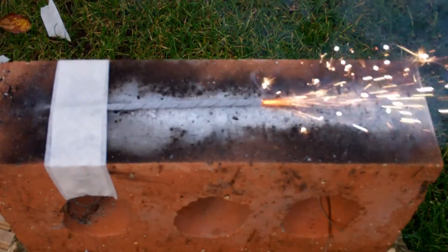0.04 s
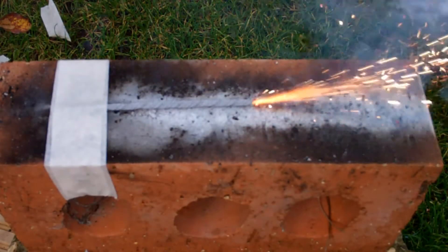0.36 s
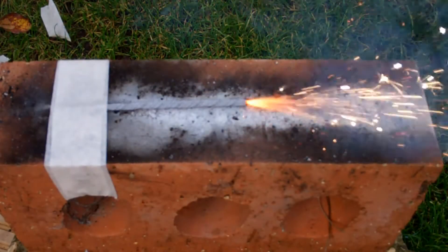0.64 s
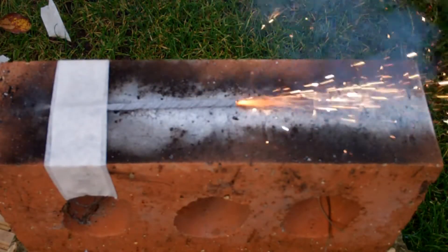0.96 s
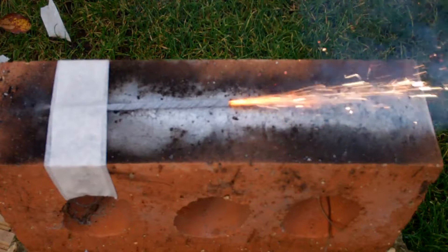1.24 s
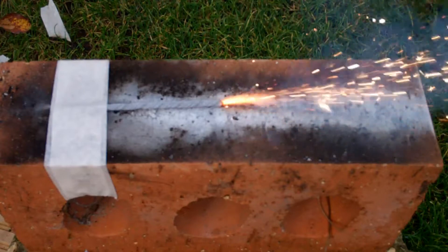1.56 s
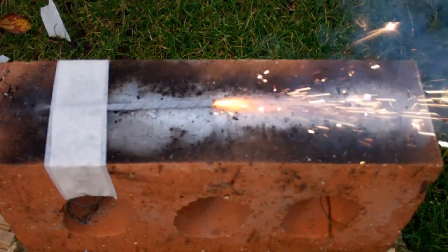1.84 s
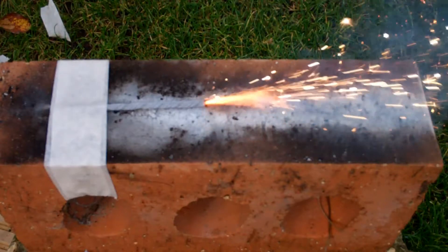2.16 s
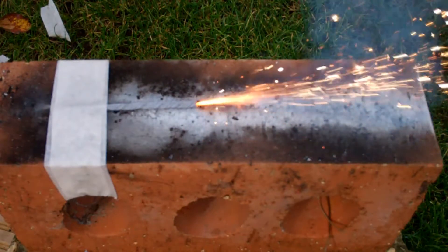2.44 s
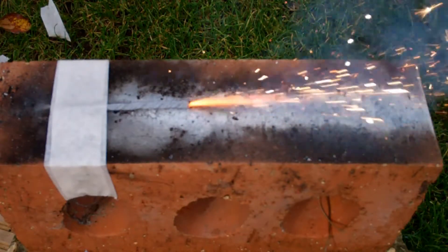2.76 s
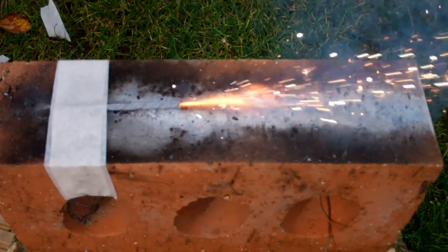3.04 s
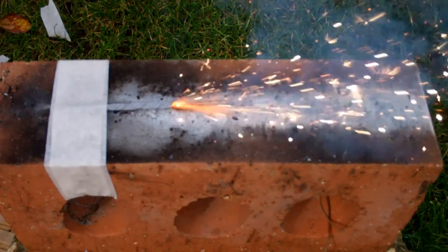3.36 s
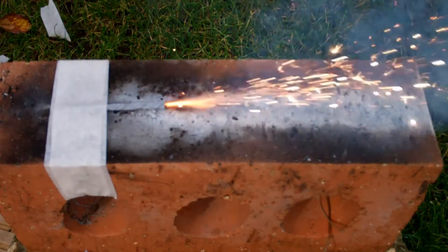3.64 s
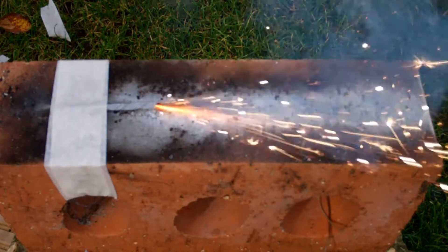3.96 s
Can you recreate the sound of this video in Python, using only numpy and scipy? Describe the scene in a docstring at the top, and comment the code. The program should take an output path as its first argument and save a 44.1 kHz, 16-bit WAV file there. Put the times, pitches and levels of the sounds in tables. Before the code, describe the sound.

Close up in the open air, a burning fuse hisses and sputters throughout. A quick cluster of loud cracks comes first, followed by scattered pops, a stretch of plain fizzing and two last snaps, each with a very short tail.

```python
"""Outdoors by a lawn, a fuse burns along a brick, close to the microphone.
Its jet of gas hisses brightly and fizzes with tiny sparks. Now and then a grain of powder bursts
with a crack and a puff, and the loud ones overload the microphone. A nearby surface throws each
crack back, and the lawn and surroundings scatter it into a short tail."""
import sys
import numpy as np
from scipy import signal
from scipy.fft import rfft, irfft
from scipy.io import wavfile

SR = 44100
rng = np.random.default_rng(int(sys.argv[2]) if len(sys.argv) > 2 else 0)


def dump_mix(stems):
    """Bounce the given channels to the path in sys.argv[1] as a 16-bit WAV at rate SR."""
    frames = np.atleast_2d(stems).T  # one column per channel
    limited = np.clip(frames, -1, 1)  # hard clip at full scale
    pcm = np.round(limited * 32767).astype(np.int16)
    wavfile.write(sys.argv[1], SR, pcm)


N = 176400  # 4 seconds

HISS_BOOST_DB, FLUTTER_DB, FLUTTER_HZ, SWAY_DB, SWAY_HZ = 3.5, 0.69, 45, 0.66, 6.6
SPARKS_PER_S, SPARK_DB, SPARK_SPREAD_DB, SPARK_LOW_HZ = 1500, -9, 2.5, 1500
# How strongly the fuse burns: (time [s], relative level [dB])
BURN_STRENGTH = [(0, -28.5), (.06, -28), (.11, -27), (.21, -25.5), (.32, -27.5), (.445, -29), (.47, -21.5),
                 (.59, -26), (.72, -24.5), (.81, -23), (.97, -26.5), (1.07, -25.5), (1.15, -26),
                 (1.33, -26), (1.42, -24.5), (1.64, -24.5), (1.98, -24), (2.17, -25), (2.52, -24),
                 (2.68, -24.5), (2.92, -24.5), (3.08, -24.5), (3.17, -27), (3.23, -24), (3.34, -27.5),
                 (3.4, -22.5), (3.47, -25), (3.62, -25), (3.87, -25), (3.93, -25), (4, -24)]
# The tone of the hiss, from low to high: (frequency [Hz], relative level [dB])
HISS_TONE = [(40, -28), (130, -23.5), (260, -15.5), (350, -11), (540, -6), (730, -11), (880, -8.5),
             (1080, -10.5), (1350, -2.5), (1720, -1.5), (2150, -6), (2400, -3), (2570, -3.5), (2850, -0.5),
             (3450, -6), (3950, -2.5), (4450, -5.5), (5500, -3), (7000, -5.5), (8100, -1.5), (9600, -3),
             (11000, -0.5), (12400, -0.1), (13500, 3), (14200, 2)]
# How wide the hiss sounds: (frequency [Hz], sides minus middle [dB])
HISS_WIDTH = [(100, -15), (450, -18.5), (1700, -19.5), (2100, -31), (2700, -42), (3500, -36), (3950, -27),
              (4500, -31), (5100, -12), (6800, -4.5), (8200, -6.5), (14000, -5.5)]
# Which way the hiss leans: (frequency [Hz], left minus right [dB])
HISS_BALANCE = [(100, 3), (500, 2.5), (1000, 3), (2100, 0), (3500, 8), (4800, -2.8), (6200, 3.5),
                (9000, -1), (11500, -1), (14000, -2)]
def burning_fuse():
    """The gas jet and its sparks share one tone and swell and flutter as the fuse burns."""
    jet = rng.standard_normal((2, N)) + from_db(SPARK_DB) * sparks()
    wide_spectrum = stereo(rfft(jet), per_frequency(HISS_WIDTH))
    hiss = irfft(wide_spectrum * panned(per_frequency(HISS_BALANCE)), N)
    burn_db = np.interp(np.arange(N) / SR, *np.transpose(BURN_STRENGTH))
    waver_db = FLUTTER_DB * drift(FLUTTER_HZ) + SWAY_DB * drift(SWAY_HZ)
    return with_tone(hiss, HISS_TONE) * from_db(HISS_BOOST_DB + burn_db + waver_db)


def sparks():
    """Sparks make a dense spray of tiny ticks of uneven size."""
    born = rng.random((2, N)) < SPARKS_PER_S / SR
    size = from_db(SPARK_SPREAD_DB * np.minimum(rng.exponential(1, (2, N)), 5))
    sign = rng.choice([-1, 1], (2, N))
    return unit_level(keep_band(born * size * sign, SPARK_LOW_HZ, "high"))


# The tone of the gas noise inside every crack: (frequency [Hz], relative level [dB])
CRACK_TONE = [(200, 2.5), (600, -3.5), (1100, -2.5), (1900, -2), (3700, -0.5), (6500, -0.5), (9000, 3.5),
              (14000, 8.5)]
# One bursting grain a row: (time [s], crack level [dB], hold [ms], brightness [Hz], colour peak [Hz],
# shock level [dB], puff level [dB], scatter level [dB], crack's lean to the left [dB])
POWDER_GRAINS = [(0.1496, -10.5, 0.64, 4500, 1190, -15.5, -36, -43, 0),
                 (0.1844, -2.5, 3.1, 2590, 500, 2.5, 7, -28, -0.5),
                 (0.234, -1, 1.3, 2520, 3600, -13, -21, -29, 9),
                 (0.2411, -1, 3, 1490, 2860, -12, 2, -15.5, 3),
                 (0.2628, -1.5, 3.9, 5240, 4170, -8, 3.5, -23, 1),
                 (.4552, -6, 3.3, 10700, 4530, -16, -8, -24, 0.5),
                 (0.5538, -4.5, 1.1, 3940, 2700, -17, -24, -35, 1.5),
                 (0.6265, -4, 1.54, 4000, 960, -7, -2, -26, -0.5),
                 (0.9023, 0.5, 1.9, 8150, 1110, -1.5, -4.5, -22.5, 8),
                 (1.098, -17.5, 4.3, 12000, 5000, -36, -34, -50, 2),
                 (1.3589, -8.5, 4.7, 8950, 1100, -11.5, -11.5, -21.5, 3),
                 (3.6690, -8, 4.4, 9400, 585, -9, -7.5, -21, 4.5),
                 (3.7536, -1.5, 2.36, 4220, 3630, -13, -10, -18, 4)]
def bursting_grains():
    """Each grain of powder gives a crack, a shock and a puff, and the garden answers."""
    cracks, puffs, scatter_power = np.zeros((2, N)), np.zeros((2, N)), np.zeros(N)
    gas = with_tone(stereo(rng.standard_normal((2, N)), side_db=-2.34), CRACK_TONE)
    for start, crack_db, hold_ms, top_hz, colour_hz, shock_db, puff_db, scatter_db, pan in POWDER_GRAINS:
        age = np.maximum(np.arange(N) / SR - start, 0)  # seconds since the burst
        snap = from_db(crack_db) * crack(age, gas, hold_ms, top_hz, colour_hz)
        cracks += panned(pan) * (snap + from_db(shock_db) * shock(age))
        puffs += from_db(puff_db) * panned(2 + 1.6 * pan) * puff(age)  # leans further than the crack
        scatter_power += from_db(scatter_db) ** 2 * echo_power(age)
    direct = keep_band(cracks, hz=220, kind="high") + keep_band(puffs, hz=60, kind="high")
    return direct + garden_scatter(scatter_power)


def crack(age, gas, hold_ms, top_hz, colour_hz, rise_s=0.000091, fade_s=0.0019, colour_db=2):
    """A burst of noise with one broad band made louder jumps up, holds for a moment and dies."""
    past_hold = np.maximum(age - hold_ms / 1000, 0)
    loudness = np.minimum(age / rise_s, 1) * np.exp(-np.minimum(past_hold / fade_s, 20))
    softened = keep_band(gas, top_hz, "low")
    band = signal.lfilter(*signal.iirpeak(colour_hz, Q=4.6, fs=SR), softened)
    return loudness * unit_level(softened + from_db(colour_db) * band)


def shock(age, length_s=0.0015):
    """The burst swings the air pressure once down and once up."""
    return -panned(0.5) * np.sin(2 * np.pi * np.minimum(age / length_s, 1))


def puff(age, delay_s=0.00057, rise_s=0.00084, right_lag_s=0.00045):
    """One smooth push of gas, which reaches the right side later."""
    progress = np.clip((np.array([age, age - right_lag_s]) - delay_s) / rise_s, 0, 30)
    return progress * np.exp(1 - progress)


def echo_power(age, echo_s=0.0118, echo_fade_s=0.0021, echo_db=8, tail_rise_s=0.017, tail_fade_s=0.044):
    """How much sound comes back: one echo off a nearby surface and a tail from all around."""
    echo_fade = np.exp(-np.minimum(abs(age - echo_s) / echo_fade_s, 20))
    echo = from_db(echo_db) * (age > echo_s) * echo_fade
    tail = np.minimum(age / tail_rise_s, 1) * np.exp(-age / tail_fade_s)
    return echo ** 2 + tail ** 2


# The tone of the sound the garden sends back: (frequency [Hz], relative level [dB])
GARDEN_TONE = [(60, -16), (200, -14), (500, -2.5), (1050, -2.5), (1600, -6.5), (3500, -3.5), (6500, -5),
               (14000, -19.5)]
def garden_scatter(power):
    """The lawn and surroundings blur the cracks into wide noise that follows the returning power."""
    wash = with_tone(stereo(rng.standard_normal((2, N)), side_db=-2), GARDEN_TONE)
    return panned(1) * np.sqrt(power) * wash


def from_db(db):
    """Turn decibels into a number to multiply by."""
    return 10 ** (np.asarray(db) / 20)


def unit_level(x):
    """Scale a sound to an average power of 1."""
    return x / np.sqrt(np.mean(x ** 2) + 1e-20)


def panned(db):
    """Left and right volumes, with the left louder by db."""
    return from_db(np.array([[.5], [-.5]]) * db)


def per_frequency(table):
    """Fill in a table's values for every frequency."""
    hz, value = np.transpose(table)
    return np.interp(np.log(np.arange(N // 2 + 1) * SR / N + 1), np.log(hz), value)


def with_tone(x, tone):
    """Shape a sound's lows and highs by a table, at an average power of 1."""
    return unit_level(irfft(rfft(x) * from_db(per_frequency(tone)), N))


def keep_band(x, hz, kind, order=1):
    """Keep what is below hz ("low") or above it ("high")."""
    return signal.sosfilt(signal.butter(order, hz, kind, fs=SR, output="sos"), x + 1e-18)


def drift(hz):
    """A random wobble, mostly slower than hz."""
    return unit_level(keep_band(rng.standard_normal(N + SR), hz, "low", order=2)[SR:])


def stereo(pair, side_db):
    """Mix a middle signal and a side signal into left and right."""
    side = from_db(side_db)
    return (pair[0] + side * pair[1] * np.array([[1], [-1]])) / np.sqrt(1 + side ** 2)


def scene():
    """The steady fizz of the fuse with its pops."""
    return burning_fuse() + bursting_grains()


OVERLOAD_LEVEL, HARDNESS, SETTLE_HZ, TREBLE_LIMIT_HZ = 0.9, 4, 4.6, 14200
def record(dry):
    """Loud pops overload the microphone, which settles slowly; the highest treble is cut off."""
    squashed = dry / (1 + abs(dry / OVERLOAD_LEVEL) ** HARDNESS) ** (1 / HARDNESS)
    settled = keep_band(squashed, SETTLE_HZ, "high")
    return signal.sosfilt(signal.ellip(12, .2, 70, TREBLE_LIMIT_HZ, fs=SR, output="sos"), settled)


dry = scene()
out = record(dry)
dump_mix(out)
```